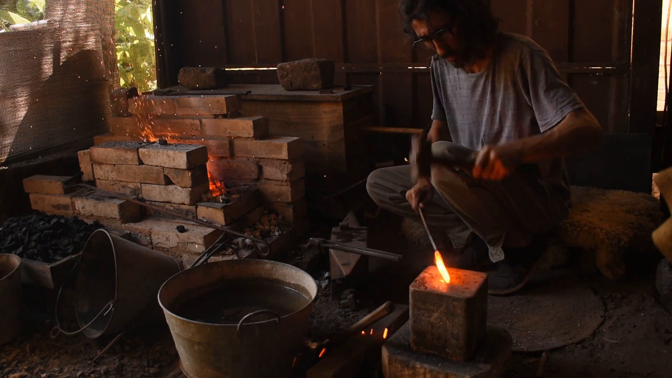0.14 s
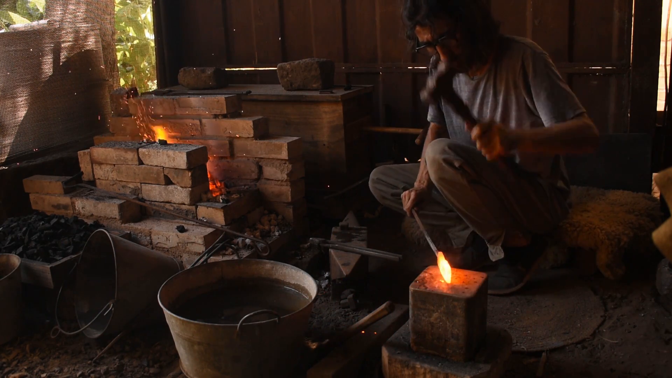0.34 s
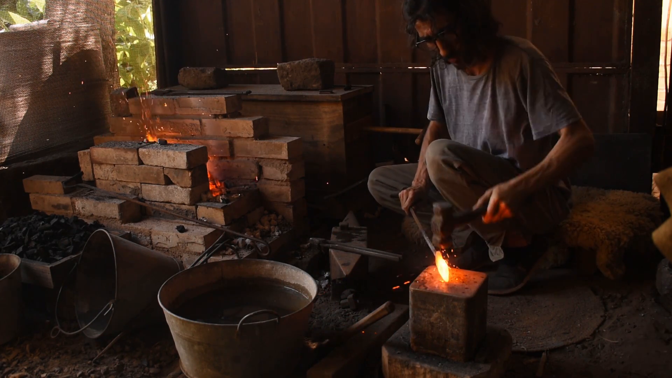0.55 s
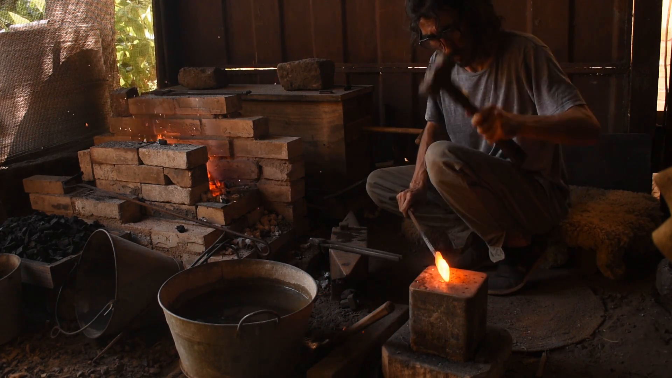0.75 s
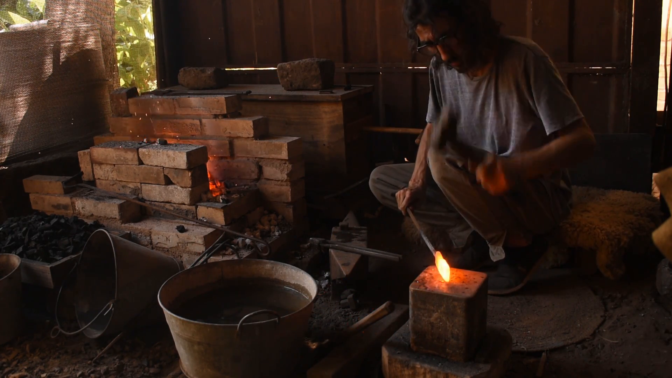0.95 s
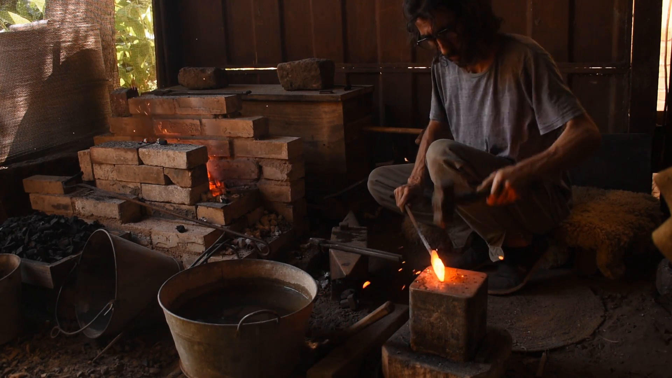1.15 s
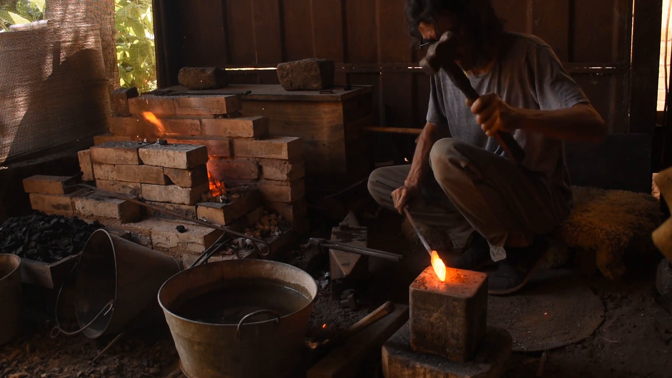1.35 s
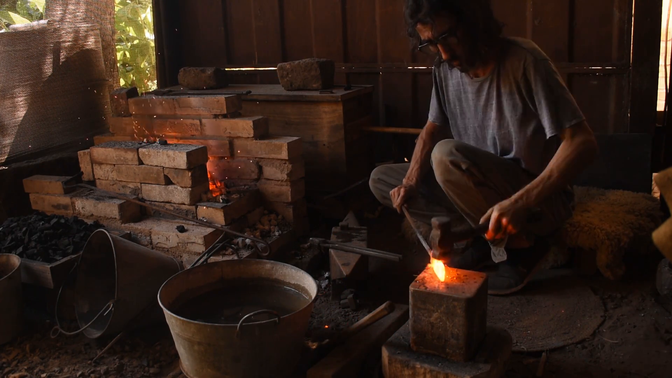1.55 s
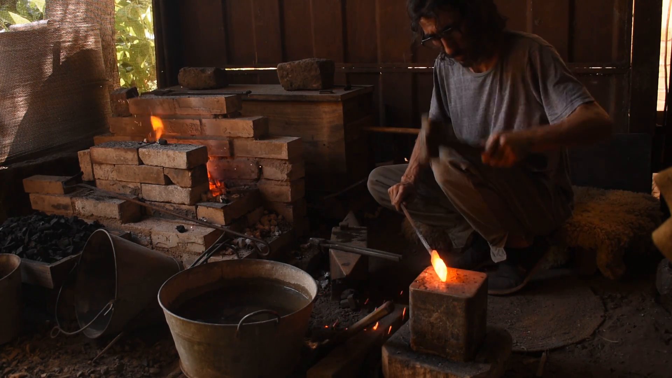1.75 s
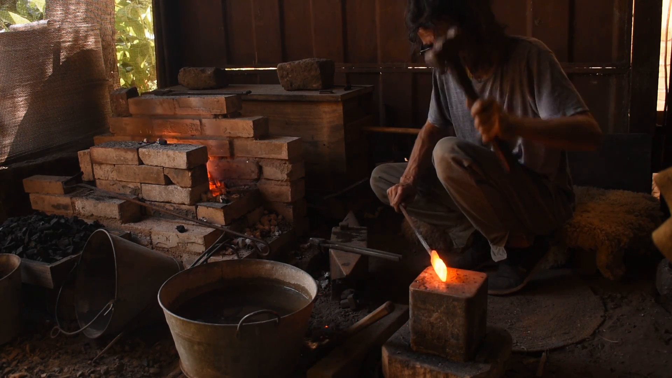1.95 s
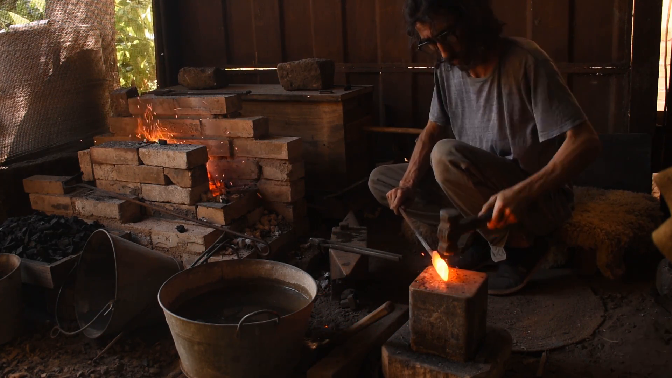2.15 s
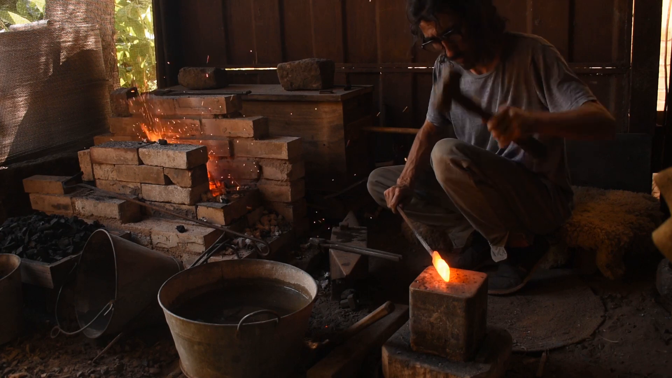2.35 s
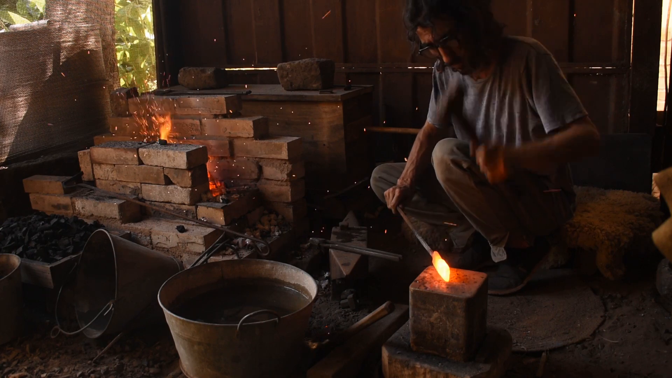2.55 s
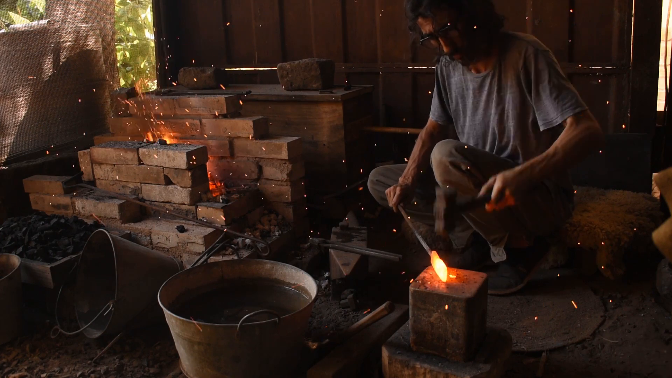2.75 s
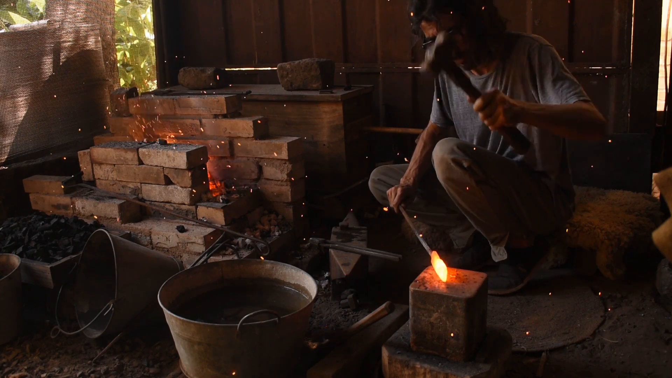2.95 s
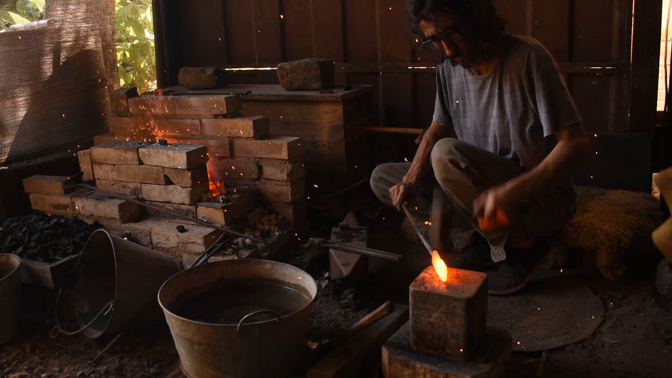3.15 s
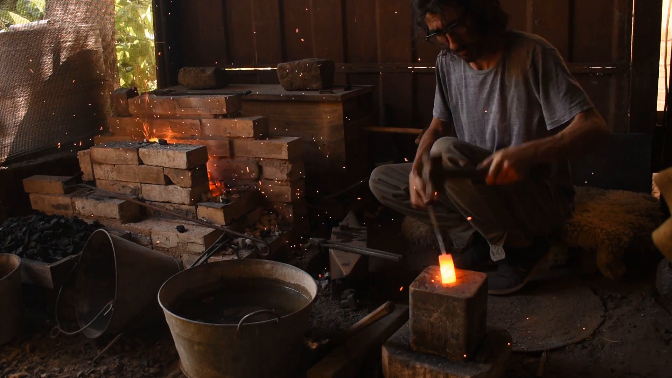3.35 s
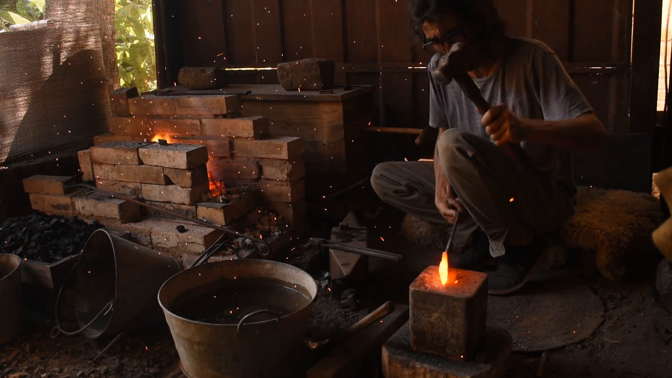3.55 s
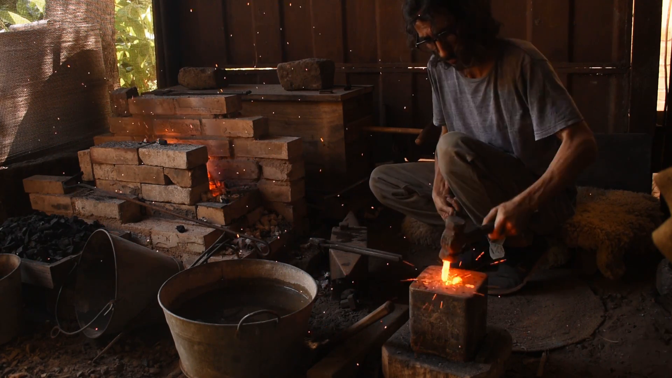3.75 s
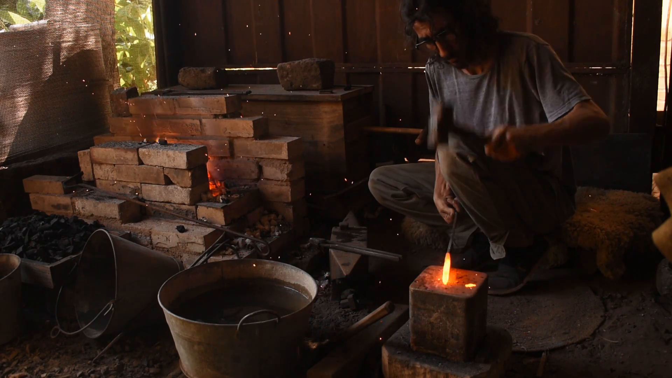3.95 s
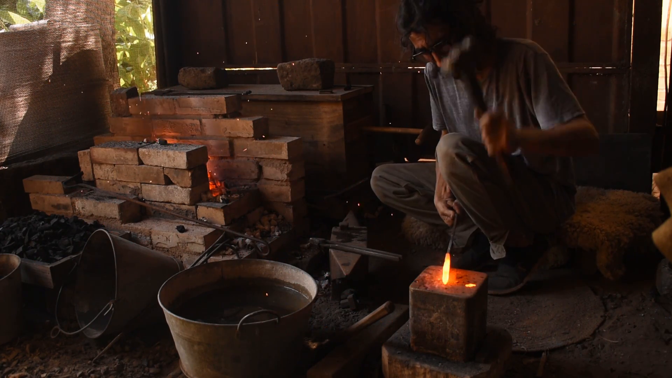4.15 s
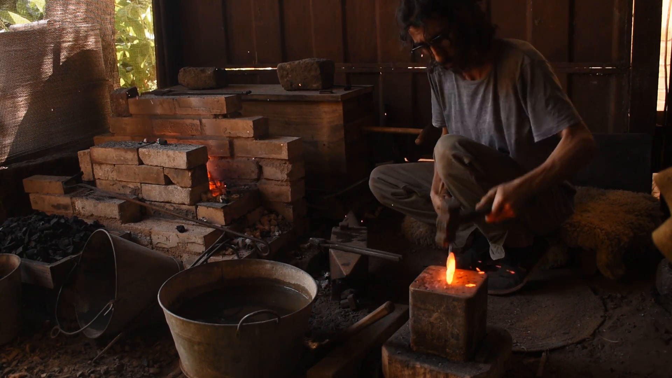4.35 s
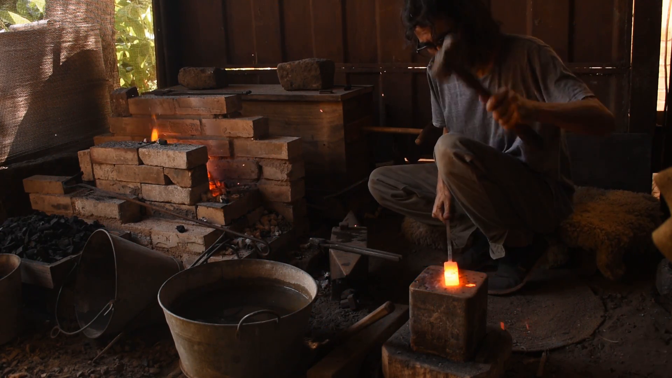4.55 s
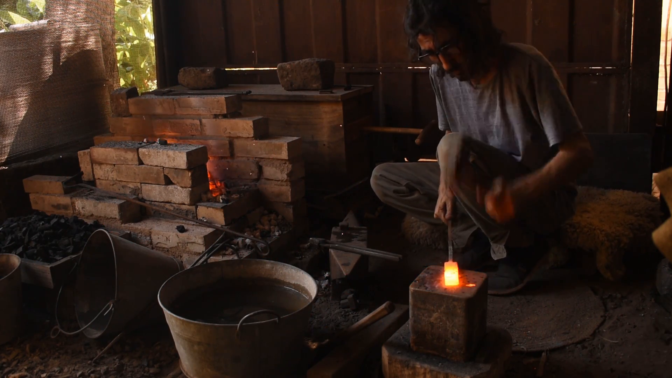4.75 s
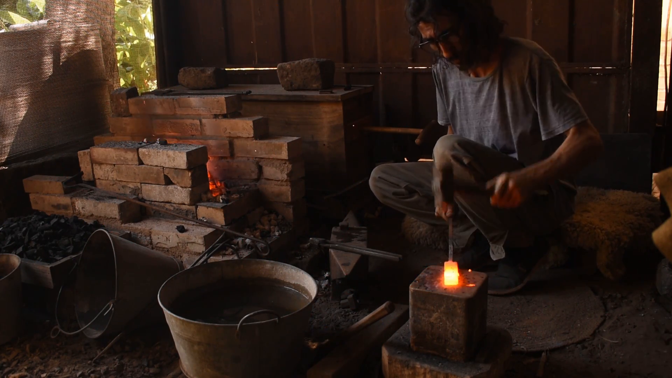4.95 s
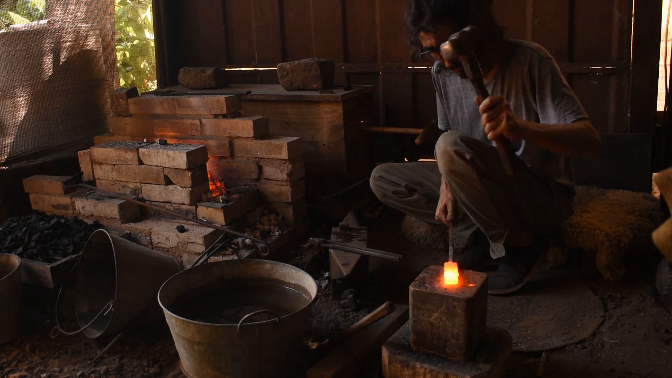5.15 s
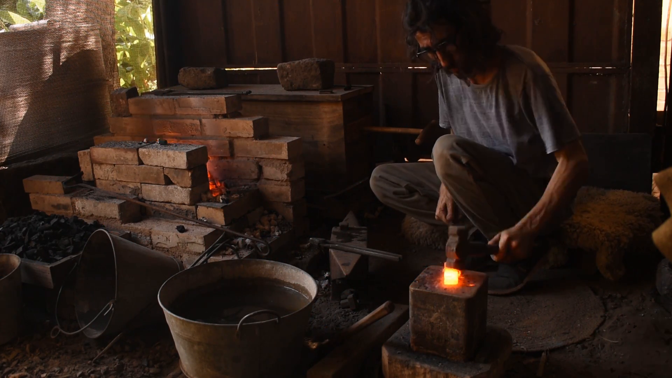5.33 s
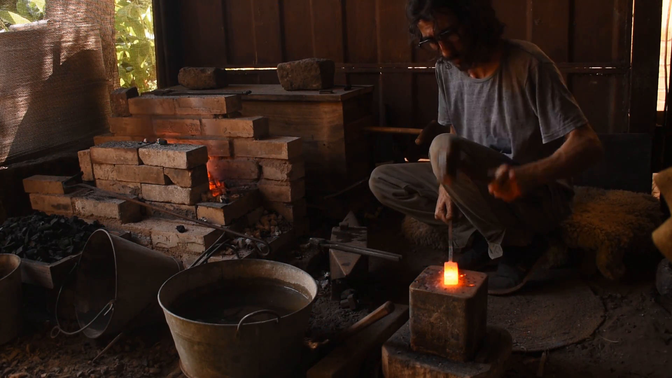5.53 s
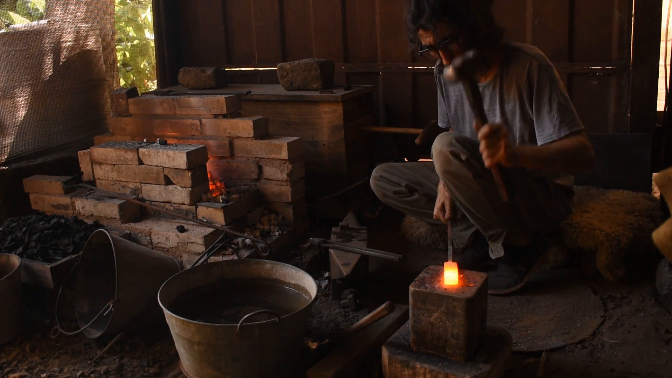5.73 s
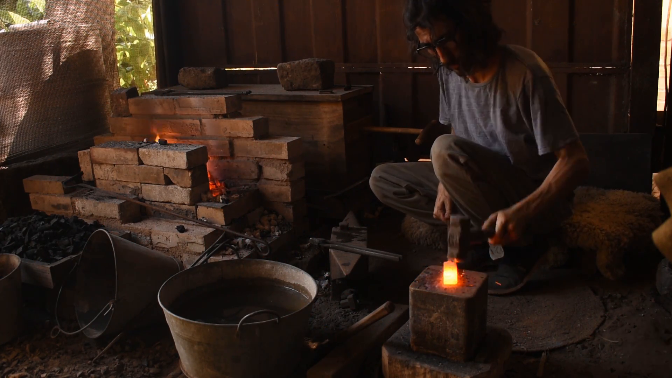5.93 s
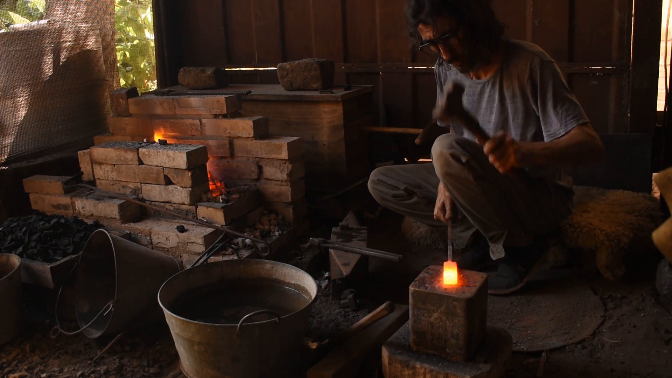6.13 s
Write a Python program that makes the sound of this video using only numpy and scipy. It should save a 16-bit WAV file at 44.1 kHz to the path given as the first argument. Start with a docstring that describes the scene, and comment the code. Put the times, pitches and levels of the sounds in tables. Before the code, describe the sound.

A hammer strikes hot steel on a block anvil twelve times, about two blows a second, close to the microphone. Each is a dull clank with a faint, very high ring and the brief echo of a small wooden shed. Behind it air roars softly through a forge and charcoal pops and crackles, thinning out near the end. The last two blows carry a bright snap. A bird twitters very faintly outside.

```python
"""Hammer blows close to the microphone, about two a second: a smith works a hot bar on a block anvil.
The soft steel gives a dead clank, the block rings on very high, and scale snaps off on the last blows.
The place is a small wooden shed, whose floor, walls and roof answer briefly.
Behind the smith, air roars softly through a charcoal forge and the brittle coals spit sparks.
Far outside a bird twitters, faint through the walls."""
import sys
import numpy as np
from scipy import signal
from scipy.fft import rfft, irfft
from scipy.io import wavfile
from scipy.ndimage import uniform_filter1d

SR = 44100
rng = np.random.default_rng(int(sys.argv[2]) if len(sys.argv) > 2 else 0)


def master_out(mix):
    """Clip the mix to full scale and print it as 16-bit PCM to the path in sys.argv[1]."""
    frames = np.transpose(np.atleast_2d(mix))
    ceiling = np.clip(frames, -1, 1)
    pcm = np.round(ceiling * 32767).astype(np.int16)
    wavfile.write(sys.argv[1], SR, pcm)


N = 272971
SIZE = 32768   # samples in one blow, pop or room response
AGE = np.arange(SIZE) / SR   # s since its onset
FREQS = np.maximum(np.fft.rfftfreq(SIZE, 1 / SR), 1)

# Hammer blows (levels in all tables are relative): t/s, clank/dB, crack/dB, sizzle/dB, bar note/Hz,
# anvil ring/dB, spot across the face (-1..1), spot along it (-1..1)
HAMMER_BLOWS = [(0.0, -0.5, 3, 2, 3950, -45, -0.44, 0.73),
                (0.5537, -7, 0.5, -5.5, 1300, -44, -0.76, -0.081),
                (1.105, -0.5, 3, -1.5, 1640, -41, 0.15, -0.079),
                (1.632, 2.5, 5.5, -1, 3510, -32.5, .1, 0.63),
                (2.167, 2, 3.5, -1.5, 1800, -39.5, -0.19, 0.71),
                (2.7137, 4, 0.5, 4.5, 1540, -34.5, -0.075, 0.44),
                (3.2559, 1.5, 4, -2, 1780, -45.5, 0.32, -0.62),
                (3.809, -8, 5, -1.5, 2505, -57.5, -0.35, 0.31),
                (4.3469, 3.5, 3.5, -1.5, 1687, -46.5, -0.16, 0.78),
                (4.8841, 2, 6, -4.5, 2547, -47.5, -.4, 0.16), (5.4137, 3.5, 8.5, 4, 1538, -45, 1, 0.014),
                (5.953, 7, 9, 4.5, 3440, -38, 0.58, .3)]


def from_db(db):
    """Decibels to gain."""
    return 10 ** (np.asarray(db) / 20)


def at_hz(points, hz):
    """Read a table on a log-frequency axis."""
    points = np.array(points)
    return np.interp(np.log(hz), np.log(points[:, 0]), points[:, 1])


def fade(t60):
    """Exponential decay, 60 dB in t60 seconds."""
    return np.exp(-np.log(1000) * AGE / t60)


def unit(x):
    """Scale to energy 1."""
    return x / np.sqrt(np.sum(x ** 2) + 1e-20)


def add(out, s, sound):
    """Mix a sound in at time s."""
    start = max(0, int(s * SR))
    out[start:start + len(sound)] += sound[:max(0, N - start)]


def filtered(x, order, hz, kind):
    """Butterworth filter."""
    return signal.sosfilt(signal.butter(order, hz, kind, fs=SR, output="sos"), x)


def click(spectrum_db):
    """The shortest causal pulse with this spectrum (minimum phase)."""
    cepstrum = irfft(np.log(from_db(spectrum_db)))
    cepstrum[1:SIZE // 2] *= 2
    cepstrum[SIZE // 2 + 1:] = 0
    return irfft(np.exp(rfft(cepstrum)))


def ring(hz, t60):
    """One decaying mode with a random phase."""
    return np.sin(2 * np.pi * hz * AGE + rng.uniform(0, 2 * np.pi)) * fade(t60)


def whiten(x, smooth_hz):
    """Take the broad colour out of a noise burst and keep its fine ripple."""
    power = uniform_filter1d(np.abs(rfft(x)) ** 2, max(3, int(smooth_hz * SIZE / SR)))
    return signal.fftconvolve(x, click(-10 * np.log10(np.maximum(power, 1e-9))))[:SIZE]


def shed(direct, echo, build_s):
    """The path to the microphone: direct sound, first echoes, a diffuse tail whose treble dies first."""
    # decay of the shed: f/Hz, t60/s
    decay_times = [(60, 0.8), (170, 0.57), (340, 0.32), (700, 0.29), (2000, 0.23), (5000, 0.22),
                   (9000, 0.17), (15000, 0.17)]
    # first echoes from floor and walls: delay/s, gain
    echoes = [(.0012, 0.22), (.0022, 0.1), (.0049, 0.33), (.0068, 0.091), (.0113, 0.21), (0.015, 0.16),
              (0.0221, 0.22)]
    edges_hz = np.geomspace(30, 18000, 13)
    tail = np.zeros(SIZE)
    for low, high in zip(edges_hz, edges_hz[1:]):
        band = filtered(rng.standard_normal(SIZE), 2, [low, high], "band")
        tail += band * fade(at_hz(decay_times, np.sqrt(low * high)))
    response = whiten(tail * (1 - np.exp(-AGE / build_s)), smooth_hz=140.5)
    response[0] += direct
    bounce = filtered(signal.unit_impulse(SIZE), 1, 7200, "low")   # the boards dull the echoes
    for s, gain in echoes:
        response += echo * gain * np.roll(bounce, int(s * SR))
    # a faint, duller tail lingers under the roof
    roof_tail = from_db(-20.5) * unit(rng.standard_normal(SIZE) * fade(t60=0.83))
    return unit(response) + filtered(roof_tail, 2, 2100, "low")


def bird(level_db, note_s):
    """Far outside: thin gliding whistles that come in through the walls."""
    # whistles: t/s, start/Hz, middle/Hz, end/Hz, level/dB
    notes = [(0.387, 4900, 5000, 4490, -77), (0.756, 4420, 4700, 5300, -67), (0.952, 4950, 4700, 4430, -76),
             (4.531, 5660, 5800, 5950, -68), (5.73, 3770, 4400, 4210, -76.5)]
    out = np.zeros(N)
    progress = np.linspace(0, 1, int(note_s * SR))
    for s, start, middle, end, db in notes:
        pitch_hz = np.polyval(np.polyfit([0, .5, 1], [start, middle, end], 2), progress)
        whistle = np.sin(2 * np.pi * np.cumsum(pitch_hz) / SR)
        add(out, s, from_db(db + level_db) * np.sin(np.pi * progress) * whistle)
    return signal.fftconvolve(out, shed(direct=0.7, echo=0.82, build_s=0.0035))[:N]


def draught(flutter_db, flutter_hz):
    """Behind the smith, air rushes through the coals: a soft roar that wavers with the flames."""
    # spectrum of the roar: f/Hz, level/dB
    roar_spectrum = [(25, -84.5), (50, -73.5), (80, -68), (140, -65.5), (220, -60), (330, -65.5),
                     (600, -60.5), (1500, -65.5), (2500, -67), (4000, -74.5), (7000, -76), (9500, -82),
                     (12500, -100), (16000, -100)]
    hz = np.maximum(np.fft.rfftfreq(N, 1 / SR), 1)
    roar = irfft(rfft(rng.standard_normal(N)) * from_db(at_hz(roar_spectrum, hz)), N)
    flames = irfft(rfft(rng.standard_normal(N)) / (1 + (hz / flutter_hz) ** 2), N)
    return from_db(flutter_db * flames / flames.std()) * roar


def flaring(rise_db_per_s, fall_db_per_s, embers_db):
    """Vigour of the sparks in dB: each flare rises, holds and sinks back to the ticking embers."""
    # showers of sparks: t/s, hold/s, level/dB
    flares = [(0.098, 0.38, -39), (1.04, .04, -32), (1.417, 0.072, -28.5), (2.264, 0.84, -24),
              (3.346, 0.17, -23), (4.063, 0.11, -33)]
    t = np.arange(N) / SR
    curves_db = [db - rise_db_per_s * np.maximum(s - t, 0) - fall_db_per_s * np.maximum(t - s - hold, 0)
                 for s, hold, db in flares]
    return np.maximum(np.max(curves_db, axis=0), embers_db)


def charcoal(peak_sparks_per_s, spread_db, pop_db, spark_db):
    """Brittle charcoal snaps brightly in the forge: single loud pops over showers of tiny ones."""
    # the loudest pops: t/s, level/dB
    pops = [(0.1966, -22.5), (0.2365, -6.5), (0.3672, -25.5), (0.6484, -15.5), (0.9316, -31.5),
            (0.9786, -30), (1.0376, -29.5), (1.341, -20.5), (1.444, -25.5), (1.5114, -21), (2.0404, 3.5),
            (2.3836, -16.5), (2.522, -2.5), (2.6541, -17), (2.9887, -21.5), (3.0154, -15.5),
            (3.1154, -21.5), (3.1947, -22.5), (3.2449, -9.5), (3.4626, -10.5), (3.593, -21.5),
            (3.7678, -16.5), (4.1619, -26.5), (4.192, -26), (4.2615, -26)]
    # spectrum of one pop: f/Hz, level/dB
    pop_spectrum = [(100, -36), (280, -23), (450, -18), (750, -14), (1100, -9), (2300, -5), (4000, -2),
                    (6000, 1), (8500, -1), (11300, -10), (14000, -20), (16000, -26)]
    vigour_db = flaring(rise_db_per_s=201.5, fall_db_per_s=142.5, embers_db=-53)
    size_db = spark_db + vigour_db + spread_db * np.clip(rng.standard_normal(N), -2, 2)
    sparks = from_db(size_db) * rng.choice([-1, 1], N)
    sparks_per_s = peak_sparks_per_s * from_db(0.32 * (vigour_db - vigour_db.max()))   # faster in a flare
    bursts = sparks * (rng.random(N) < sparks_per_s / SR)
    for s, db in pops:
        fracture = whiten(rng.standard_normal(SIZE) * fade(t60=0.0013), smooth_hz=900)
        add(bursts, s, from_db(db + pop_db) * fracture)
    snaps = signal.fftconvolve(bursts, click(at_hz(pop_spectrum, FREQS)))[:N]
    return signal.fftconvolve(snaps, shed(direct=1.1, echo=0.15, build_s=0.0014))[:N]


def scale_snaps(hz, t60, rise_s, low_cut_hz):
    """Close by, a flake of scale breaks with a short, bright ping; it is too small to give any bass."""
    # flakes cracking off the bar: t/s, level/dB
    flakes = [(5.421, -2), (5.9597, 2.5)]
    out = np.zeros(N)
    for s, db in flakes:
        ping = ring(hz, t60) * (1 - np.exp(-AGE / rise_s))
        add(out, s, from_db(db) * ping / np.abs(ping).max())
    out = filtered(out + 1e-18, 2, low_cut_hz, "high")
    return signal.fftconvolve(out, shed(direct=3.0, echo=0.8, build_s=0.00217))[:N]


def anvil(level_db, spread_db, swell_s):
    """The block's high modes ring on between the blows; the spot struck decides which of them lead."""
    # modes of the block: f/Hz, level/dB, t60/s, family
    modes = [(6309, -17, .5, "a"), (7687, 0, .37, "a"), (8882, -14, .2, "a"), (10200, -18, .4, "a"),
             (11610, -26, .56, "a"), (7596, 0, .46, "b"), (13140, -28, .5, "b"), (10122, 0, .62, "c"),
             (14900, -36, .3, "c"), (10898, 0, .46, "d")]
    # each family's answer to the spot struck: centre/dB, gain at the edge across/dB, and along/dB
    families = {"a": (0, 0, 9.2), "b": (0, 8.8, -4), "c": (0, -7, -4.5), "d": (-6.5, 2.3, 0)}
    out = np.zeros(N)
    for s, *_, ring_db, across, along in HAMMER_BLOWS:
        family_db = {name: ring_db + np.dot(row, [1, across, along]) for name, row in families.items()}
        tone = sum(from_db(level_db + db + family_db[family] + rng.normal(0, spread_db)) * ring(hz, t60)
                   for hz, db, t60, family in modes)
        add(out, s, tone * (1 - np.exp(-AGE / swell_s)))
    return out


def body(swell_s):
    """Stump, tongs and shed resonate, swelling just after a blow."""
    # their resonances: f/Hz, spectral peak/dB, t60/s
    modes = [(305, 5, .22), (440, 2, .22), (492, 6, .24), (601, 6, .27), (665, 4, .22), (830, 3, .24),
             (896, 6, .26), (1060, 4, .24), (1249, 5, .25), (1334, 6, .25), (1400, 4, .25), (1505, 10, .26),
             (1550, 9, .26), (1617, 9, .27), (1696, 9, .26), (1783, 11, .25), (1965, 4, .2), (2527, 7, .18),
             (3400, 5, .12), (3472, 8, .22)]
    tone = sum(from_db(db) * 2 * np.log(1000) / (t60 * SR) * ring(hz, t60) for hz, db, t60 in modes)
    return tone * (1 - np.exp(-AGE / swell_s))


def hammer(crush, crush_t60, body_db, scatter, note_width_hz):
    """In front: a sharp contact and milliseconds of crushing scale, coloured by how the hammer lands."""
    # spectrum of a blow on hot steel: f/Hz, level/dB
    impact = [(40, -35), (80, -11.5), (160, -8.5), (280, 5.5), (450, 11), (750, 10), (1500, 14.5),
              (2300, 8.5), (4000, 3), (6000, 8.5), (8800, 3.5), (11300, -14.5), (14000, -23), (16000, -29)]
    # dips where the shed's echoes cancel at the microphone: f/Hz, half width/Hz, level/dB
    dips = [(173, 7.8, -10.5), (260, 2.1, -5), (347, 4.1, -11), (393, 11, -8.5), (548, 1.6, -1),
            (733, 43, -8.5), (990, 17, -7), (1116, 6.2, -4)]
    # where thud, clank, crack and sizzle lie: f/Hz
    bands_hz = [450, 1600, 3500, 8500]
    out = np.zeros(N)
    response = shed(direct=0.76, echo=1.0, build_s=0.00011) + from_db(body_db) * body(swell_s=0.00033)
    dips_db = sum(db / (1 + ((FREQS - hz) / width) ** 2) for hz, width, db in dips)
    common_db = at_hz(impact, FREQS) + dips_db
    for s, clank, crack, sizzle, bar_hz, *_ in HAMMER_BLOWS:
        contact = crush * unit(rng.standard_normal(SIZE) * fade(crush_t60))
        contact[0] += 1
        thud = 4 + 0.21 * clank   # dB; the thud hardly changes from blow to blow
        colour_db = common_db + at_hz(list(zip(bands_hz, [thud, clank, crack, sizzle])), FREQS)
        # bar and tongs add one damped note that shifts with the grip; the higher, the more it stands out
        note_db = 3.0 + 5 * np.log2(bar_hz / 1620)
        colour_db += note_db / (1 + ((FREQS - bar_hz) / note_width_hz) ** 2)
        force = signal.fftconvolve(whiten(contact, smooth_hz=496), click(colour_db))[:SIZE]
        # hammer, tongs and smith move, so part of the sound scatters anew with every blow
        scattered = scatter * shed(direct=0.1, echo=0.33, build_s=0.0004)
        add(out, s, signal.fftconvolve(force, response + scattered))
    return out


def scene():
    """One microphone in the shed: the smith near, the forge behind him, the bird far off."""
    smith = hammer(crush=2.26, crush_t60=.009, body_db=-1.5, scatter=0.57, note_width_hz=120)
    smith += anvil(level_db=-1.0, spread_db=1.8, swell_s=0.0018)
    smith += scale_snaps(hz=8320, t60=0.0019, rise_s=0.00027, low_cut_hz=2600)
    forge = charcoal(peak_sparks_per_s=85, spread_db=8.0, pop_db=0.5, spark_db=-5.5)
    forge += draught(flutter_db=2.8, flutter_hz=6.6)
    return (smith + forge + bird(level_db=-1.0, note_s=0.061))[None]


def record(dry):
    """The hardest peaks are rounded and the top is cut steeply above 16.3 kHz."""
    rounded = .9 * np.tanh(dry / .9)
    return signal.sosfilt(signal.ellip(10, .2, 80, 16300, fs=SR, output="sos"), rounded)


dry = scene()
out = record(dry)
master_out(out)
```